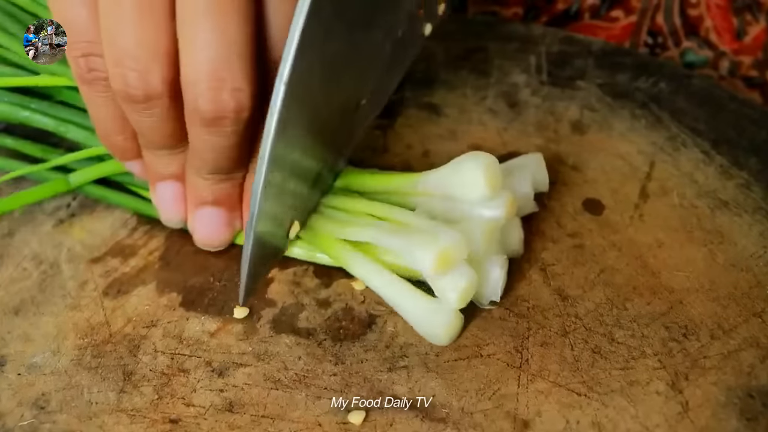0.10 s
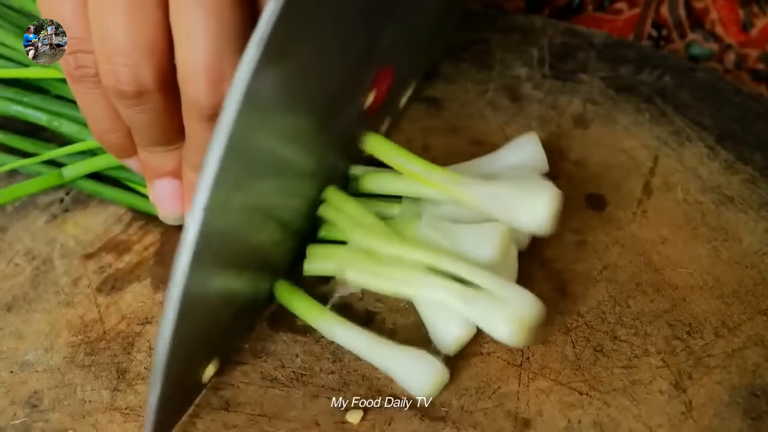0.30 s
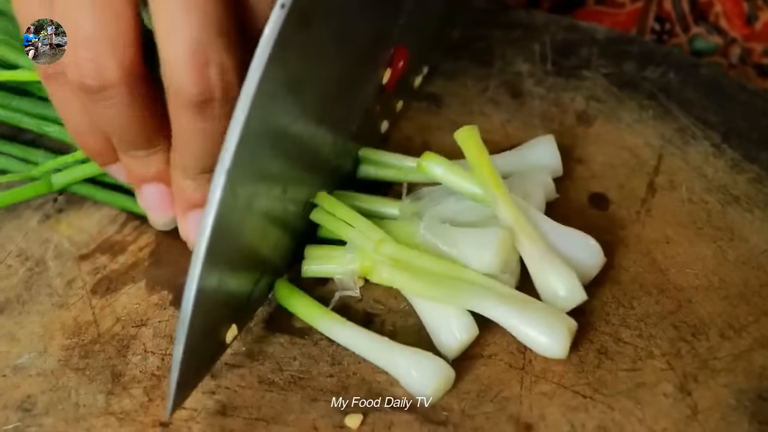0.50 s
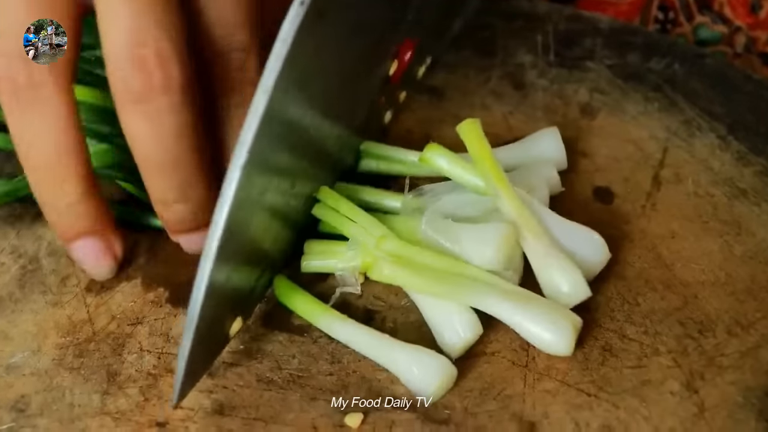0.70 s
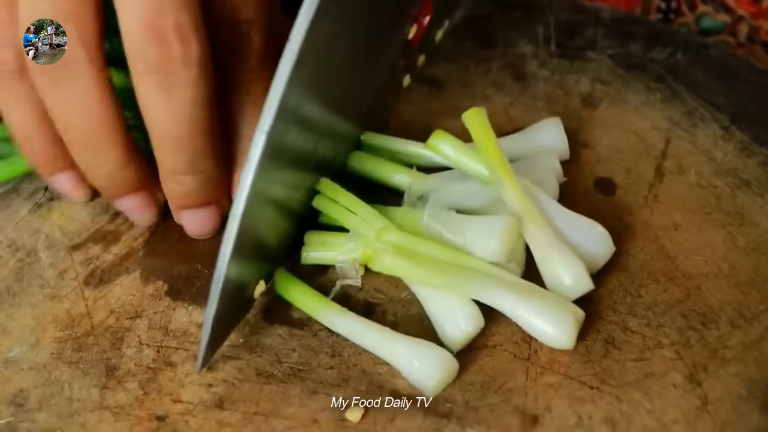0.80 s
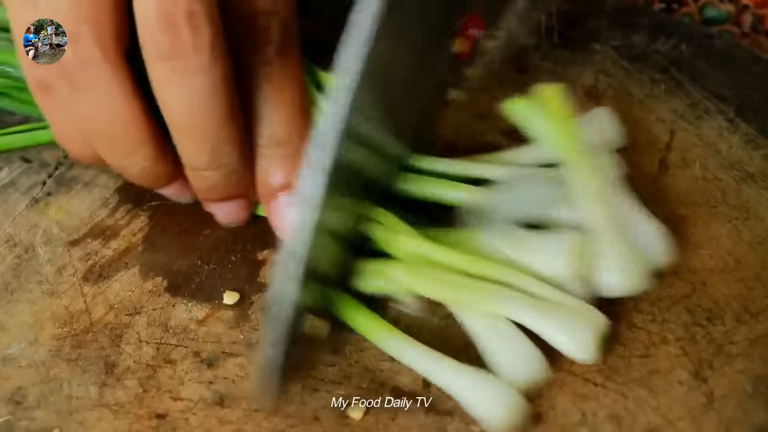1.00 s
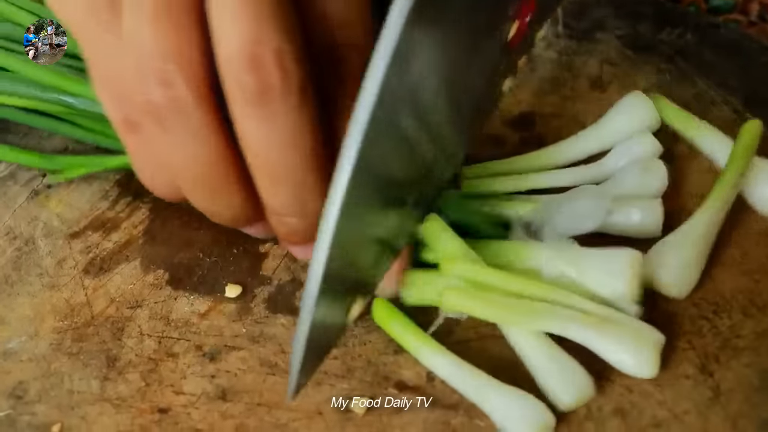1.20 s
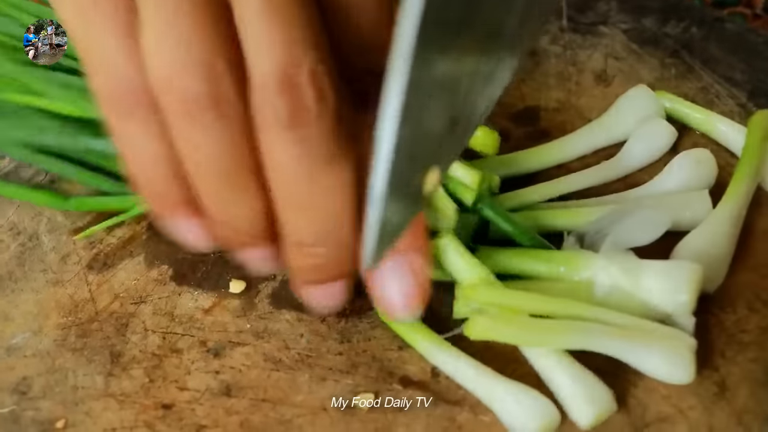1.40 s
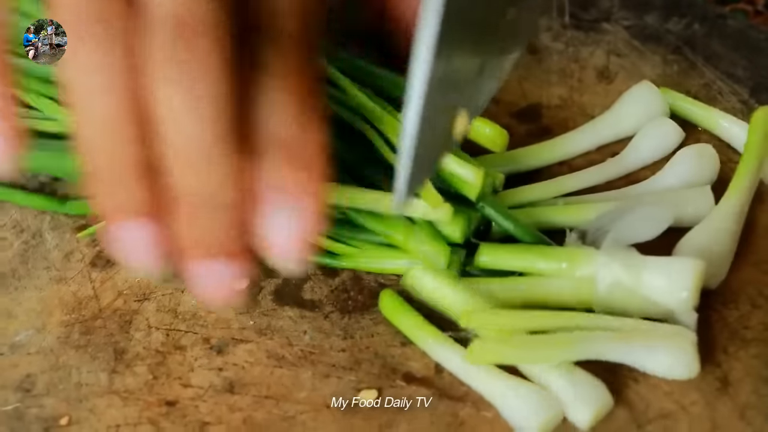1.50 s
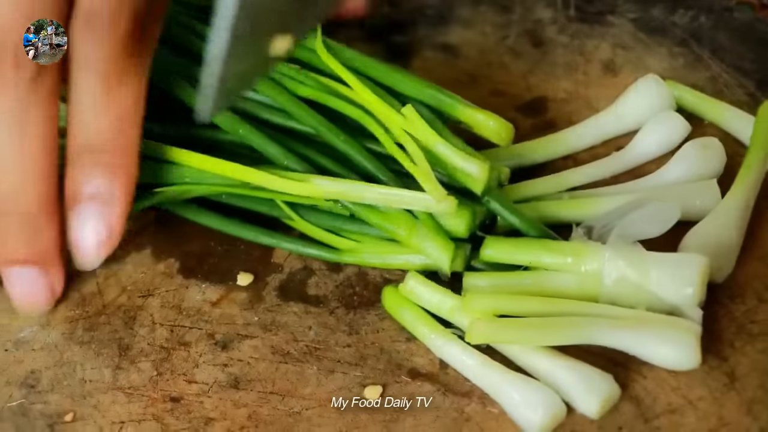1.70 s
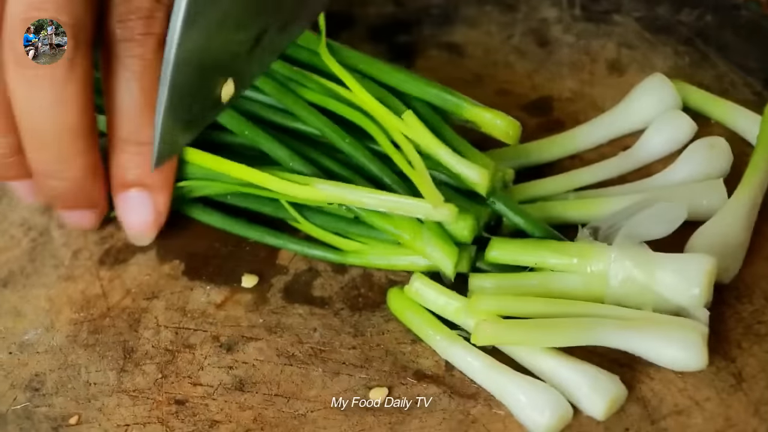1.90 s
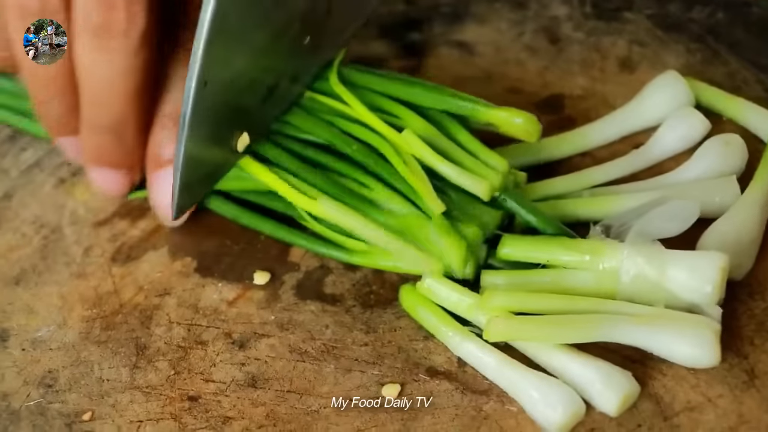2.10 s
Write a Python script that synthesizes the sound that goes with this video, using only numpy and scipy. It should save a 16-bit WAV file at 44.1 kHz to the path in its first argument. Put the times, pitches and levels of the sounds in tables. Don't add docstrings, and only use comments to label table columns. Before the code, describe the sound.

Close and dry, outdoors: stalk fibres snap and crunch under a heavy blade that thunks on wood, followed by much quieter dragging, bulb bumps and rustling leaves over a soft river hiss and low wind rumble.

```python
import sys
import numpy as np
from scipy import signal
from scipy.io import wavfile

SR = 44100
rng = np.random.default_rng(int(sys.argv[2]) if len(sys.argv) > 2 else 0)


def makeup_ratio(level_db):
    decades = np.asarray(level_db, float) / 20
    return 10 ** decades


def put_to_file(sound):
    columns = np.atleast_2d(sound).T
    safe = np.clip(columns, -1, 1)
    whole_steps = np.round(safe * 32767)
    wavfile.write(sys.argv[1], SR, whole_steps.astype(np.int16))


N = 92610


def rms_one(x):
    return x / np.sqrt(np.mean(x ** 2) + 1e-20)


def gain_of(rows, fade_s=0.0021):
    s, db = np.transpose(rows)
    s = np.sort(s)
    times = np.r_[s[0] - fade_s, s, s[-1] + fade_s]
    levels = np.r_[db[0] - 25, db, db[-1] - 25]
    return makeup_ratio(np.interp(np.arange(N) / SR, times, levels, left=-110, right=-110))


def drift(rate):
    r = np.exp(-80 * np.pi * rate / SR)
    noise = rng.standard_normal(N // 40 + 2002)
    slow = signal.lfilter([1], [1, -2 * r, r * r], noise)[2000:]
    return np.interp(np.arange(N) / 40, np.arange(len(slow)), rms_one(slow))


def bandpass(x, low_hz, high_hz, order=1):
    return signal.lfilter(*signal.butter(order, [low_hz, high_hz], "band", fs=SR), x)


def ring(x, hz, t60):
    r, w = makeup_ratio(-60 / (t60 * SR)), 2 * np.pi * hz / SR
    return signal.lfilter([0, np.sin(w)], [1, -2 * r * np.cos(w), r * r], x + 1e-18)


def body(x, modes):
    return sum((-1) ** k * makeup_ratio(db) * ring(x, hz, t60) for k, (hz, db, t60) in enumerate(modes))


def grains(rate, spread_db):
    sizes = makeup_ratio(spread_db * np.minimum(rng.exponential(1, N), 4)) * rng.choice([-1, 1], N)
    return sizes * (rng.random(N) < rate / SR)


def banded(spectrum, source, patchy_db, rate):
    hz, db = np.transpose(spectrum)
    edges = 20 * 2 ** np.arange(0, 9.9, .5)
    out, together = 0, drift(rate)
    for k, (low, high) in enumerate(zip(edges, edges[1:])):
        level_db = np.interp(np.log(low * high) / 2, np.log(hz), db, left=-70, right=-70)
        sos = signal.butter(2, [low, high], "band", fs=SR, output="sos")
        band = signal.sosfilt(sos, source[k % 2])
        flicker_db = patchy_db * (.5 * together + drift(rate))
        out = out + makeup_ratio(level_db + flicker_db) * band
    return rms_one(out)


def clicks(events, cycles, tail_s, crack_db, partner, floor_hz, tail_cycles=np.inf):
    contact_lag_s = .001
    out, t = np.zeros(N + 3000), np.arange(900) / SR
    for (s, db, hz), noise in zip(events, rng.standard_normal((len(events), 900))):
        decay_s = min(tail_s, tail_cycles / hz)
        burst = np.r_[noise * np.exp(-t / decay_s) * .5, np.zeros(2100)]
        burst[0] = 1.1
        hz = min(hz, 12000)
        sound = ring(burst, hz, cycles / hz) + 0.3 * ring(burst, partner * hz, cycles / hz)
        sound = bandpass(sound, floor_hz * hz, min(1.7 * hz, 19000), order=2)
        crack = makeup_ratio(crack_db) * bandpass(burst, 1500, 5000, order=2)
        start = int((s + contact_lag_s) * SR)
        out[start:start + 3000] += makeup_ratio(db) * (sound / np.abs(sound).max() + 0) + makeup_ratio(db) * crack
    return out[:N]


# [t/s, level/dB]
CRUSH_FORCE = [
    (0, -49),
    (.15, -48),
    (.205, -42),
    (.2415, -30),
    (.244, -20),
    (.288, -20),
    (.293, -35),
    (.36, -79),
    (.372, -53),
]
# [f/Hz, level/dB, t60/s]
STALK_MODES = [(2400, -13, 0.0027), (3930, -11, 0.0065), (5000, -6.5, 0.0037), (6830, -9, 0.0032),
               (8250, -4, 0.0023), (9340, -6, 0.0028), (11000, -11.5, 0.0018), (13500, -6.5, 0.0016)]


def crush():
    force = gain_of(CRUSH_FORCE)
    cracks = grains(5000, spread_db=3.6)
    groan = ring(cracks, 170, .09)
    thud = ring(force * cracks, 170, .09) / np.std(groan)
    return force * rms_one(body(cracks, STALK_MODES)) + makeup_ratio(-17) * thud


# [t/s, peak level/dB, f/Hz]
FIBRE_CRACKS = [(.0338, -32.5, 4830), (.0372, -29.5, 12000), (.052, -33, 6000), (.0737, -24.5, 9000),
                (.087, -27.5, 3000), (.102, -36, 3800), (.1151, -24, 5550), (.119, -23, 9000),
                (.1251, -16, 9450), (.144, -24.5, 4200), (.163, -25, 9000), (.170, -26, 9000),
                (.174, -27, 8600), (.1795, -30, 8800), (.187, -29, 9000), (.1945, -33, 9000),
                (.2109, -23.5, 8500), (.2169, -24, 8340), (.226, -17, 9000), (.2324, -20, 4520),
                (.238, -37, 4500), (.2428, -19, 9600), (.2468, -18, 9210), (.2503, -19, 6500),
                (.2535, -11, 4600), (.257, -10.5, 4750), (.2635, -24, 5000), (.2857, -9, 3930),
                (.794, -35, 9000), (1.3117, -34, 2600), (1.6589, -38, 2910), (1.6818, -33, 2660),
                (1.826, -36, 3700), (1.8689, -37, 2400), (1.8739, -29.5, 2020), (1.89, -45, 4300),
                (1.9365, -37, 9000), (1.9557, -31.5, 4160), (1.9557, -33, 9150), (2.0011, -37, 2400),
                (2.001, -36, 4800), (2.008, -37, 2500), (2.016, -43, 3800), (2.029, -36, 2400),
                (2.044, -37, 2200), (2.0745, -32, 4000), (.2895, -10.5, 4200), (1.0395, -28.5, 8800)]


def fibres():
    return clicks(FIBRE_CRACKS, cycles=6, tail_s=.0009, crack_db=-33, partner=1.44, floor_hz=0.47)


# [f/Hz, level/dB, t60/s]
BOARD_STRUCK_MODES = [(100, -14, .08), (172, -10, .09), (430, -5.5, .032), (600, -4, .022), (720, 1, .02),
                      (860, -11, .015)]


def chop():
    land_s, soft_hz, peak_db = .29055, 750, 1
    push = np.zeros(N)
    push[int(land_s * SR)] = -1
    push = bandpass(push, .5 * soft_hz, 2 * soft_hz)
    out = sum(makeup_ratio(db) * ring(push, hz, t60) for hz, db, t60 in BOARD_STRUCK_MODES)
    return makeup_ratio(peak_db) * out / np.abs(out).max()


# [t/s, length/s, level at start/dB, level at end/dB, hollow tone level/dB]
DRAG_STROKES = [(0.2, 0.0517, -40, -24, -2), (0.2474, 0.043, -26, -11.5, -1),
                (0.317, 0.042, -34, -29.5, -7), (0.415, 0.02, -27.5, -37.5, -28),
                (0.437, 0.029, -38, -30.5, -5), (0.469, 0.052, -27, -39, -22), (0.62, 0.083, -45, -62, -9),
                (0.735, 0.046, -43, -35.5, -7.5), (0.793, 0.032, -28, -23.5, -5),
                (0.826, 0.022, -33, -35.5, 2), (0.863, 0.031, -36, -40, -0.5),
                (0.973, 0.06, -38, -37.5, 8.5), (1.04, 0.058, -35, -37.5, 3), (1.148, 0.17, -56, -54, 7),
                (1.817, 0.026, -33, -42.5, -11), (1.857, 0.089, -47, -54.5, 5.5),
                (2.068, 0.022, -36.5, -56, 4.5)]
# [f/Hz, level/dB, t60/s]
BOARD_RUBBED_MODES = [(663.5, 1, 0.031), (763, 5.5, 0.04), (903.5, 3, 0.038), (1230, -3.5, 0.039),
                      (1410, 5, 0.015), (1860, -2.5, 0.013), (2164, -5.5, 0.019), (3100, 5.5, 0.0018),
                      (4690, -9.5, 0.019)]


def drag():
    slips = rms_one(grains(1500, spread_db=1))
    slips = slips / np.std(body(slips, BOARD_RUBBED_MODES))
    pressure, hollow_pressure = 0, 0
    for s, length, start_db, end_db, hollow_db in DRAG_STROKES:
        stroke = gain_of([(s, start_db), (s + length, end_db)], fade_s=0.0042)
        pressure = pressure + stroke
        hollow_pressure = hollow_pressure + stroke * makeup_ratio(hollow_db)
    hollow = ring(slips * hollow_pressure, 458.4, 0.053)
    out = body(slips * pressure, BOARD_RUBBED_MODES) + hollow
    return makeup_ratio(-2) * signal.lfilter(*signal.butter(2, 340, "high", fs=SR), out)


# [t/s, peak level/dB, f/Hz]
SKIN_SNAPS = [(0.0154, -32, 4840), (0.0374, -35, 7550), (0.0684, -28, 8900), (0.0767, -36, 9100),
              (0.1171, -22, 4130), (0.1265, -25, 8600), (0.159, -22, 9100), (0.3124, -36, 8600),
              (0.3426, -29, 8400), (0.3626, -24.5, 8600), (0.7938, -28, 3300), (1.039, -24, 5770),
              (0.436, -37, 8400),
    (0.4408, -34, 8300),
    (1.466, -35, 3870),
    (1.542, -35, 3620),
    (1.714, -36, 2400),
    (1.793, -34, 3500),
    (1.834, -33.5, 3370),
    (1.876, -34, 3650),
    (2.073, -34, 3560),
]


def snaps():
    events = SKIN_SNAPS
    return clicks(events, cycles=7, tail_s=.0026, crack_db=-30.5, partner=1.6, floor_hz=.65)


# [t/s, peak level/dB, f/Hz]
WOOD_TAPS = [(0.115, -26, 1450), (0.395, -29, 830), (0.423, -22.5, 854), (0.626, -34, 1480),
             (0.68, -33.5, 2770), (0.794, -31.5, 800), (0.876, -26.5, 742), (1.066, -23.5, 874),
             (1.077, -21, 915), (1.467, -32.5, 1720), (1.542, -35.5, 1500), (1.663, -46, 660),
             (1.754, -43, 433), (1.793, -40, 1000), (1.89, -37, 810), (1.9545, -23, 1850),
             (2.073, -36, 452)]


def taps():
    return clicks(WOOD_TAPS, cycles=15, tail_s=.002, crack_db=-14, partner=.8, floor_hz=.6, tail_cycles=1.8)


# [t/s, peak level/dB, f/Hz]
BULB_BUMPS = [(.16, -37, 283), (.218, -31, 1540), (.2435, -11, 776), (.273, -23, 960), (.75, -32, 861),
              (.794, -29, 890), (.933, -38, 770), (.978, -29, 740), (1.002, -26, 820), (1.651, -40, 894),
              (1.655, -42.5, 452), (1.749, -42.5, 600), (1.793, -38, 1570), (1.821, -34.5, 389),
              (1.835, -42, 391), (1.862, -42, 377), (1.885, -40, 395), (2.007, -43.5, 845),
              (2.033, -44, 780), (2.079, -40, 426), (1.915, -47, 400), (1.94, -41, 402), (.37, -36, 167),
              (.25, -21.5, 487), (1.089, -30.5, 810)]


def bumps():
    return clicks(BULB_BUMPS, cycles=20, tail_s=.002, crack_db=-20, partner=2.2, floor_hz=0.78)


# [t/s, length/s, level/dB, tilt/dB per octave]
BLADE_BRUSHES = [
    (1.064, .03, -52, -4),
    (1.21, .025, -55, 0),
]
# [f/Hz, level/dB, t60/s]
BLADE_MODES = [(2980, -7, .05), (4463, 0, .06), (6202, 0, .07), (7950, 3, .04), (10250, -4, .04),
               (12580, -5, .1), (13360, -6, .03)]


def blade():
    touch = rms_one(grains(3000, spread_db=3.0)) * .12
    out = 0
    for s, length, db, tilt_db in BLADE_BRUSHES:
        modes = [(hz, level_db + tilt_db * np.log2(hz / 6000), t60) for hz, level_db, t60 in BLADE_MODES]
        out = out + body(touch * gain_of([(s, db), (s + length, db - 0.5)]), modes)
    return out


# [t/s, level/dB]
HAND_MOTION = [(0, -46), (.36, -44), (.38, -84), (.43, -48), (.52, -47.5), (.59, -54.5), (.65, -47.5),
               (.71, -58.5), (.8, -49.5), (1.1, -50.5), (1.25, -47.5), (1.5, -50.5), (1.63, -55),
               (1.66, -49), (1.74, -52.5), (1.79, -52), (1.9, -54), (2.1, -51)]
# [f/Hz, level/dB per Hz]
LEAF_SPECTRUM = [(150, -40), (250, -4), (538, -2.5), (875, 1.5), (2570, -3.5), (2910, -3), (4410, -5.5),
                 (13000, -16), (16000, -28)]
# [t/s, length/s, level/dB, f/Hz]
LEAF_BRUSHES = [(0.161, 0.078, -42.5, 8800), (0.811, 0.012, -43.5, 3580), (0.807, 0.016, -48, 7500),
                (0.808, 0.033, -58, 12200), (0.01, 0.22, -50.5, 13500), (0.874, 0.041, -52, 8700),
                (1.409, 0.056, -51, 8400), (1.418, 0.014, -45.5, 13100), (1.654, 0.014, -49.5, 6960),
                (1.68, 0.038, -49.5, 7450), (1.905, 0.14, -56.5, 8950)]


def leaves():
    rubbing = [grains(3500, 4.2), grains(3500, 4.2)]
    out = gain_of(HAND_MOTION) * banded(LEAF_SPECTRUM, rubbing, patchy_db=.7, rate=20)
    fine = grains(8000, 4.0)
    width_octaves = .35
    for s, length, db, hz in LEAF_BRUSHES:
        edges = np.minimum(hz * 2 ** (width_octaves * np.array([-.5, .5])), .45 * SR)
        hiss = signal.sosfilt(signal.butter(1, edges, "band", fs=SR, output="sos"), fine)
        out = out + gain_of([(s, db), (s + length, db)], fade_s=0.005) * rms_one(hiss)
    return out


# [t/s, level/dB]
WIND_GUSTS = [(0, -50), (.3, -41), (.4, -45.5), (.52, -57.5), (.68, -47.5), (.72, -53), (.99, -46),
              (1.06, -51.5), (1.1, -40.5), (1.14, -52.5), (1.6, -50.5), (1.76, -44), (1.8, -50),
              (1.95, -47.5), (2.1, -52)]
# [f/Hz, level/dB per Hz]
WIND_SPECTRUM = [(22, -3.5), (45, -8.5), (68, -3), (110, -11.5), (170, -7.5), (260, -45)]


def wind():
    air = rng.standard_normal((2, N))
    return gain_of(WIND_GUSTS) * banded(WIND_SPECTRUM, air, patchy_db=-1.0, rate=5.0)


# [f/Hz, level/dB per Hz]
RIVER_SPECTRUM = [(150, -0.5), (334, -4), (1000, -7), (2500, -8.5), (8000, -10.5), (12000, -20.5),
                  (15500, -17), (18000, -30)]


def river():
    water = rng.standard_normal((2, N))
    return makeup_ratio(-52) * banded(RIVER_SPECTRUM, water, patchy_db=.4, rate=5)


def scene():
    cutting = crush() + fibres() + chop() + drag()
    handling = snaps() + taps() + bumps() + blade() + leaves()
    mono = cutting + handling + wind() + river()
    return np.array([mono, mono])


def top_cut(x):
    return signal.sosfilt(signal.butter(12, 16240, fs=SR, output="sos"), x)


def record(dry):
    low_pass = signal.cheby2(20, 60, 16400, fs=SR, output="sos")
    x = np.clip(signal.sosfilt(low_pass, dry), -1, 1)
    grit = np.diff(x[0], prepend=0) * rng.standard_normal(N) * 2.5
    presence = 2 * bandpass(x[0], 1200, 6000)
    warmth = .8 * signal.lfilter([.03], [1, -.97], x[0])
    side = makeup_ratio(-36) * (grit + presence + warmth)
    mix = x + side * [[1], [-1]]
    return top_cut(mix)


dry = scene()
out = record(dry)
put_to_file(out)
```